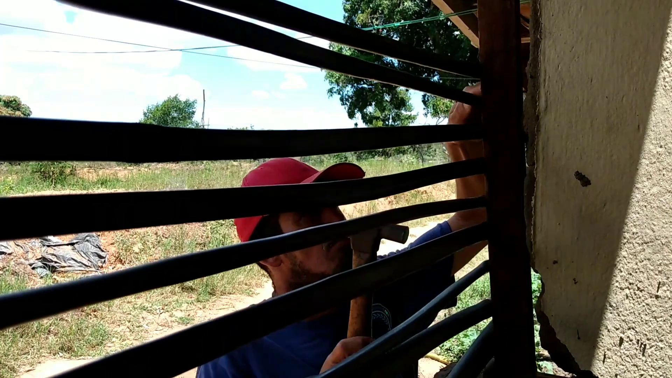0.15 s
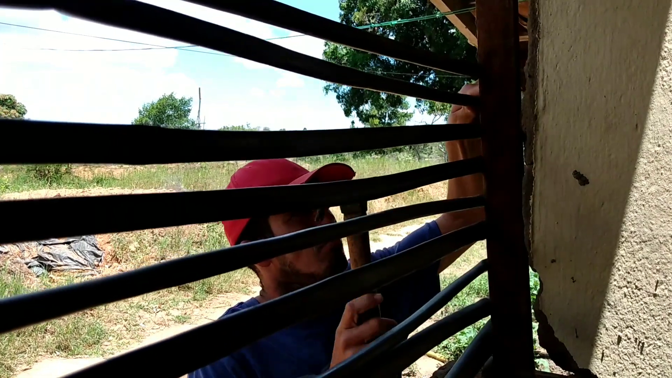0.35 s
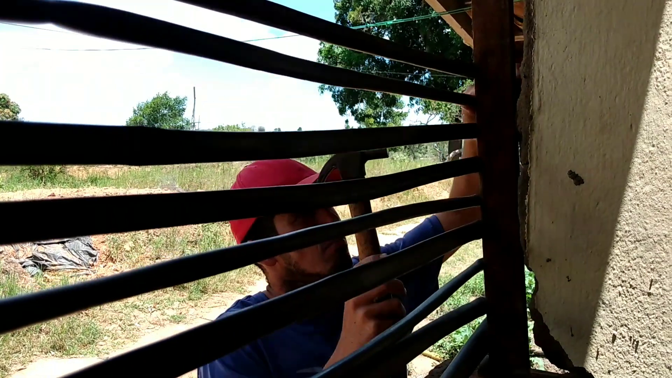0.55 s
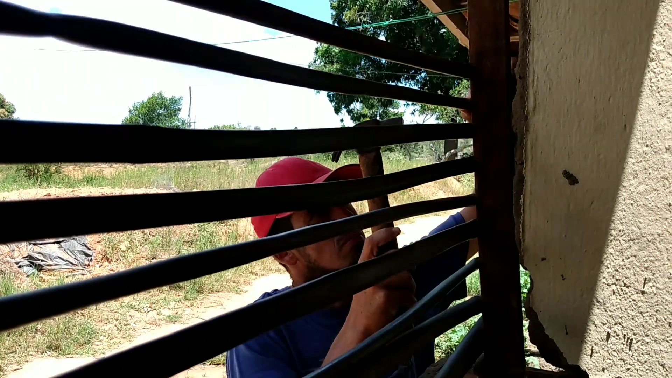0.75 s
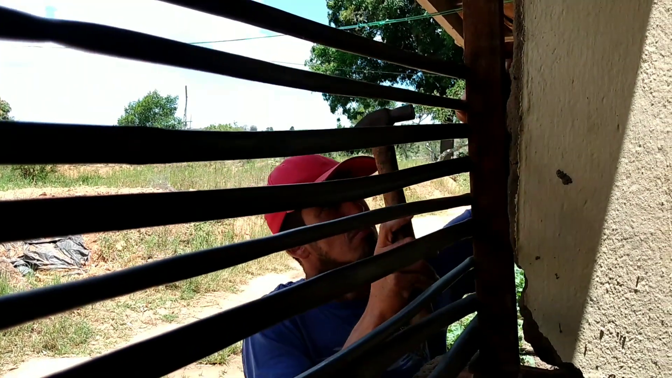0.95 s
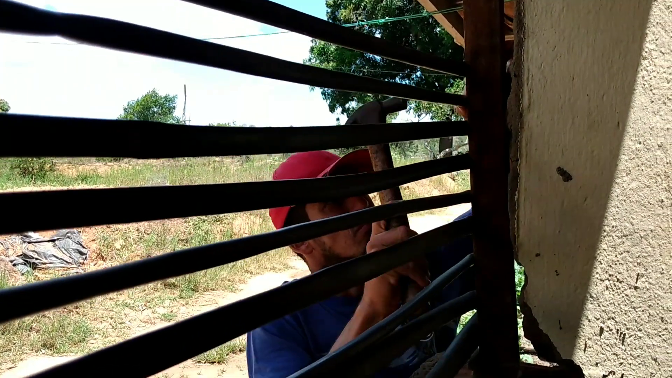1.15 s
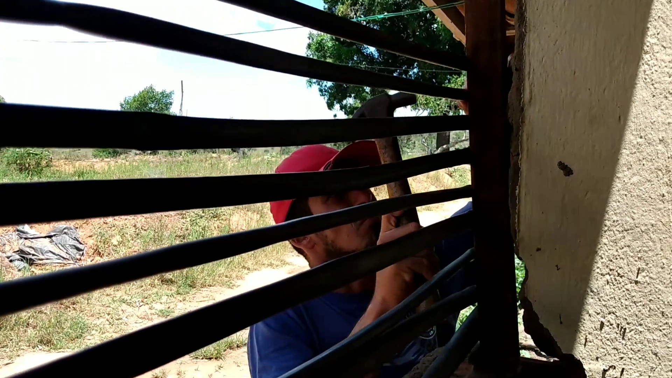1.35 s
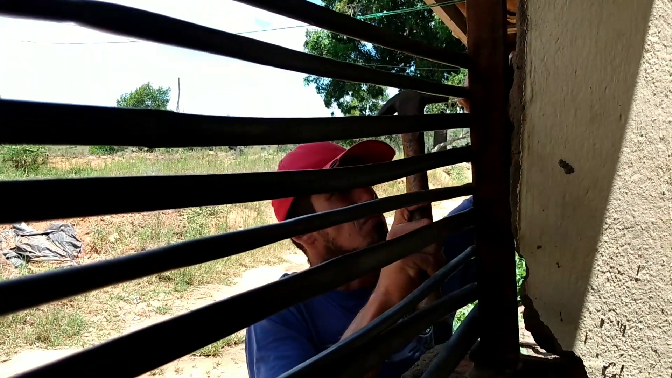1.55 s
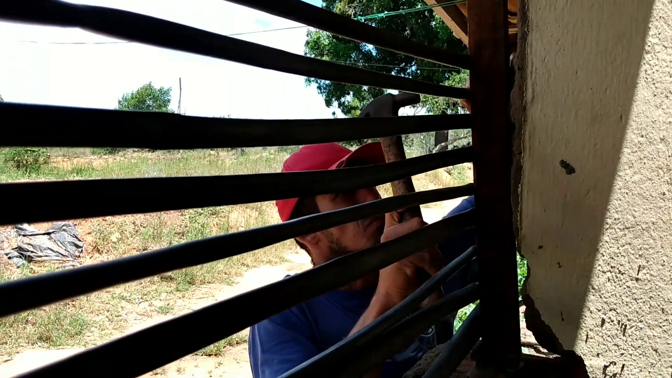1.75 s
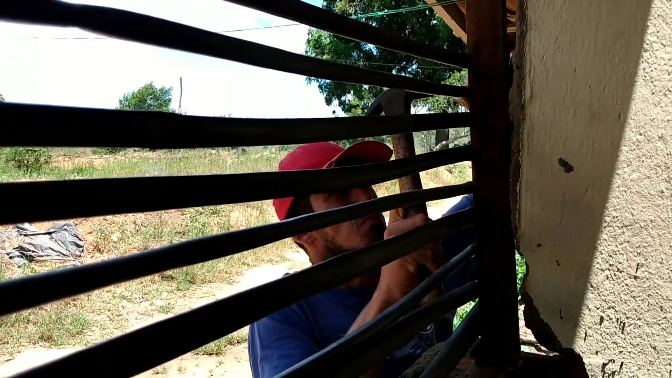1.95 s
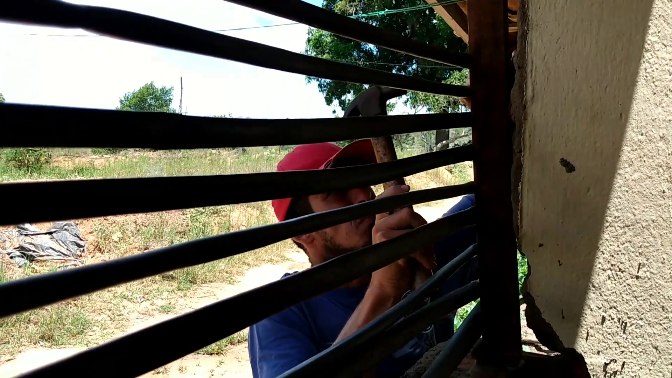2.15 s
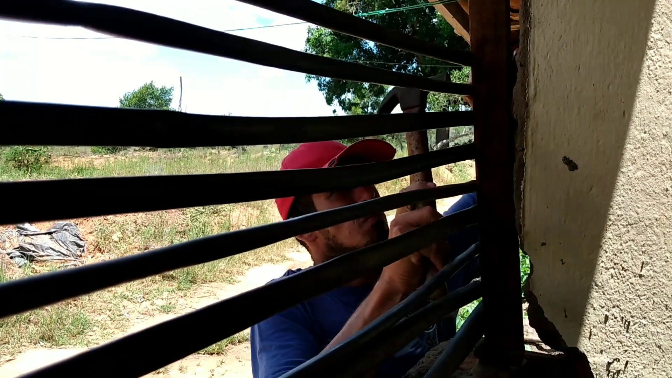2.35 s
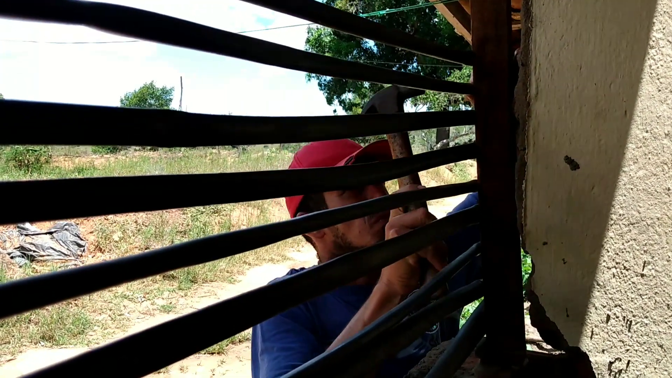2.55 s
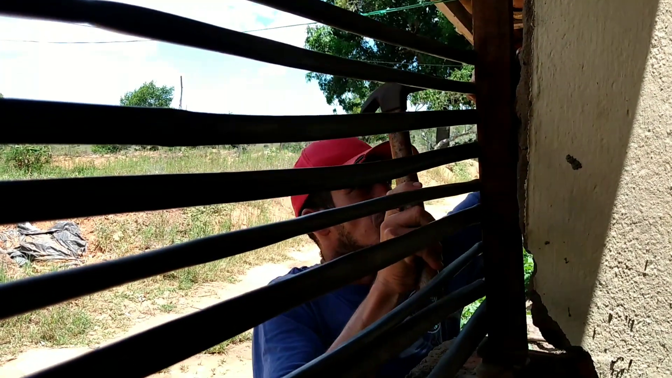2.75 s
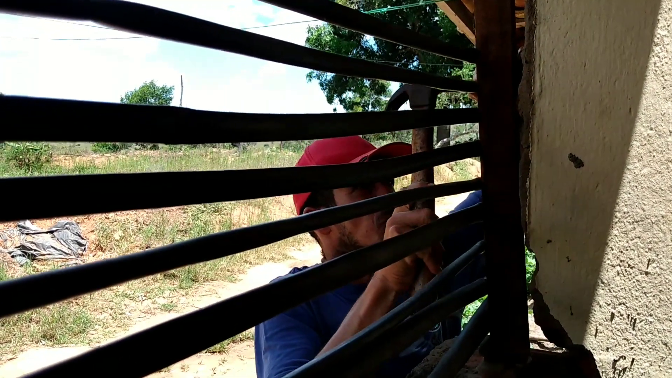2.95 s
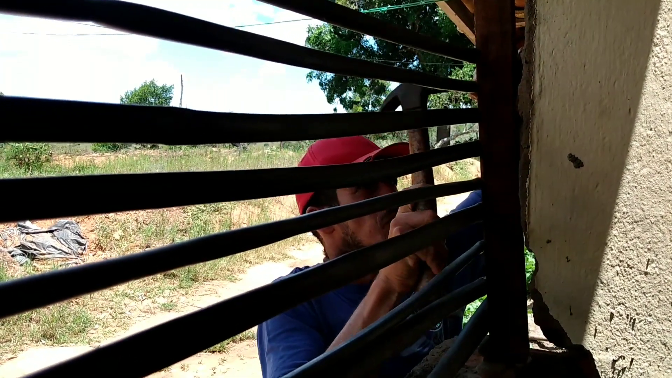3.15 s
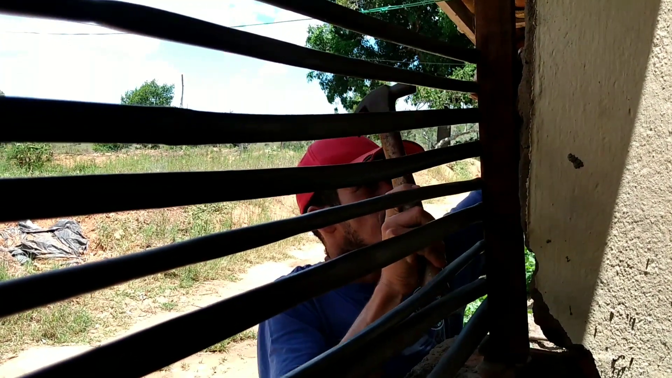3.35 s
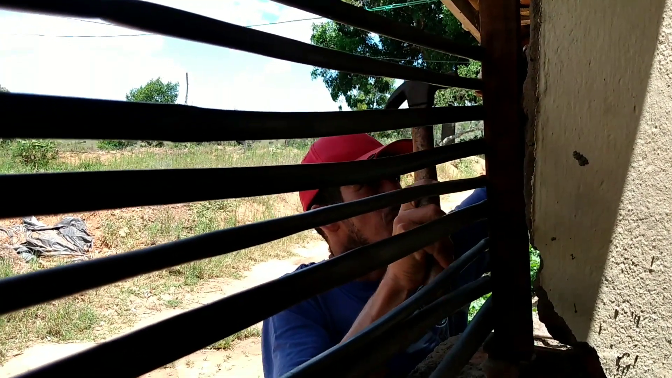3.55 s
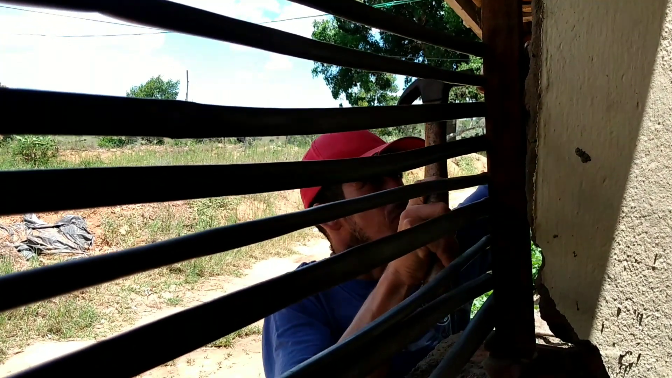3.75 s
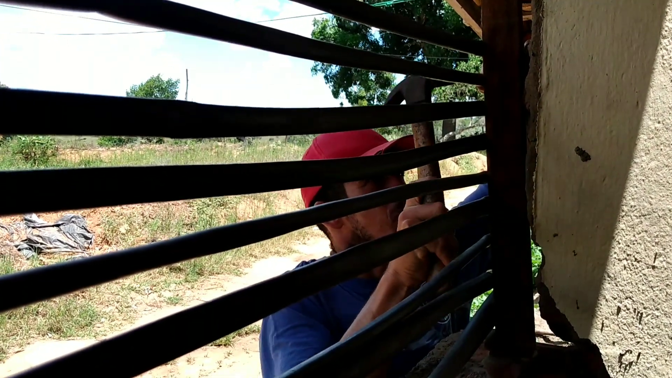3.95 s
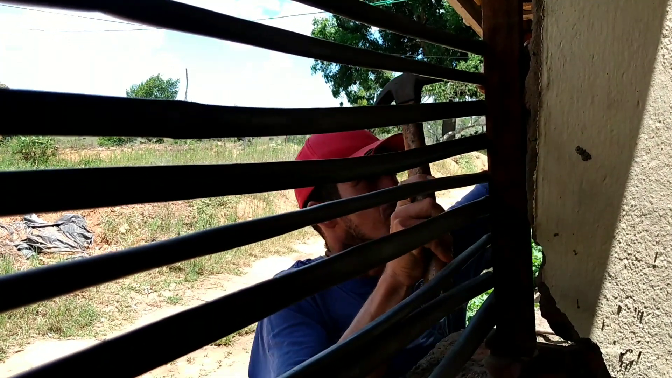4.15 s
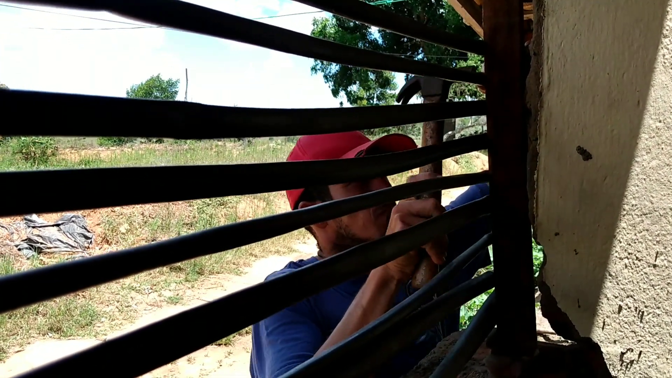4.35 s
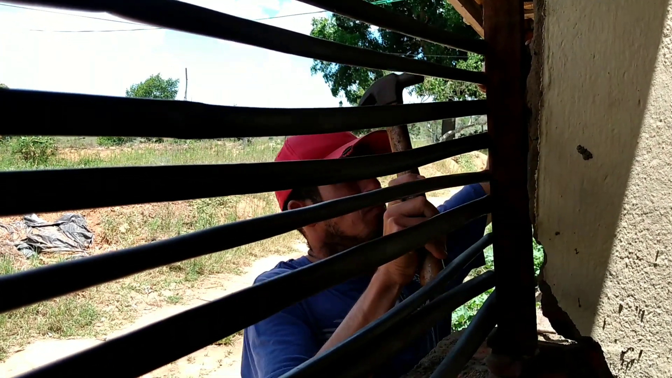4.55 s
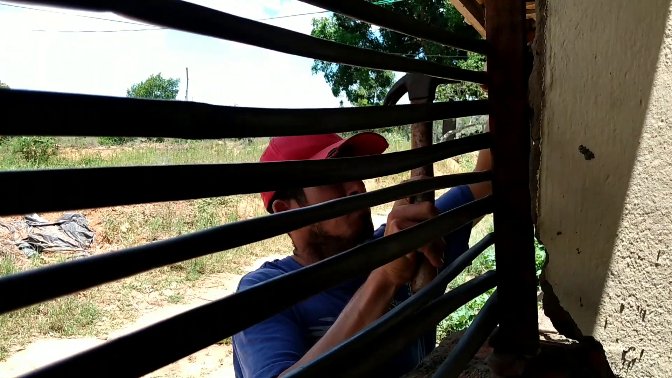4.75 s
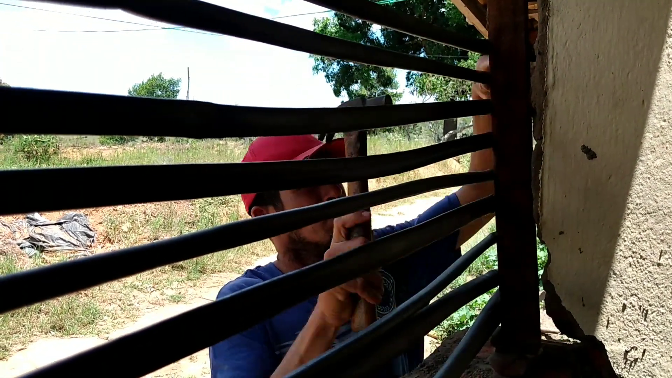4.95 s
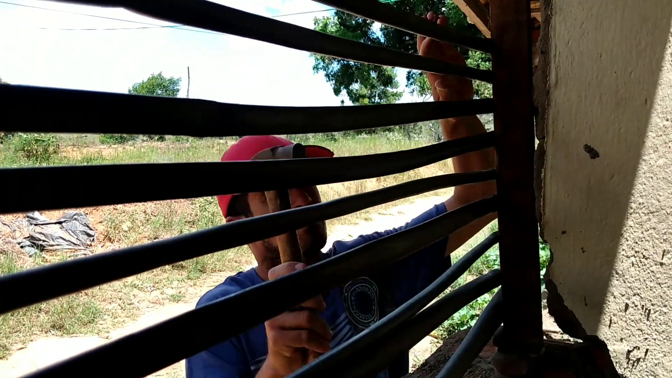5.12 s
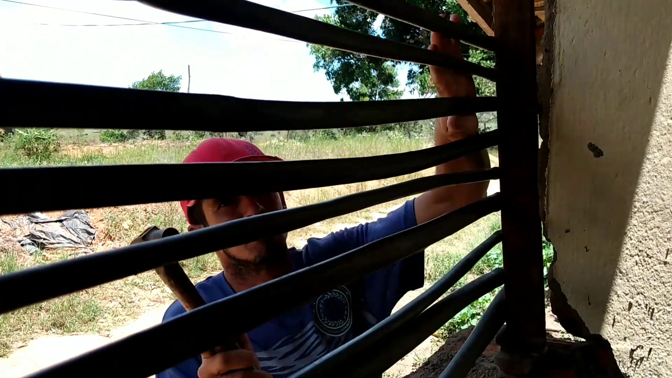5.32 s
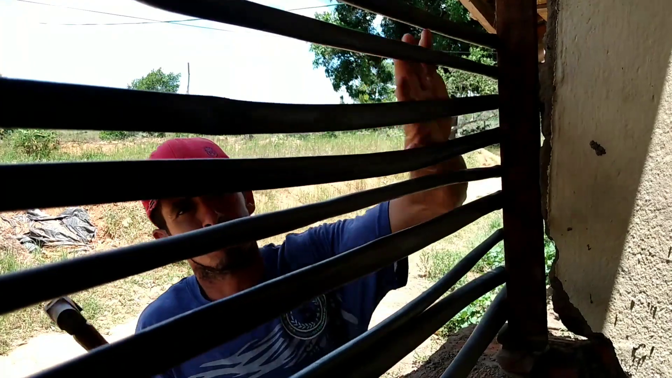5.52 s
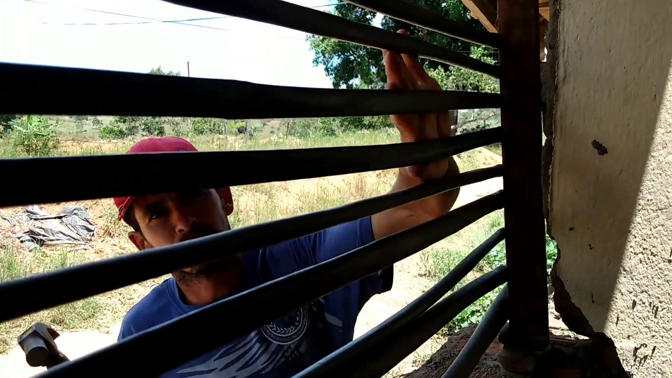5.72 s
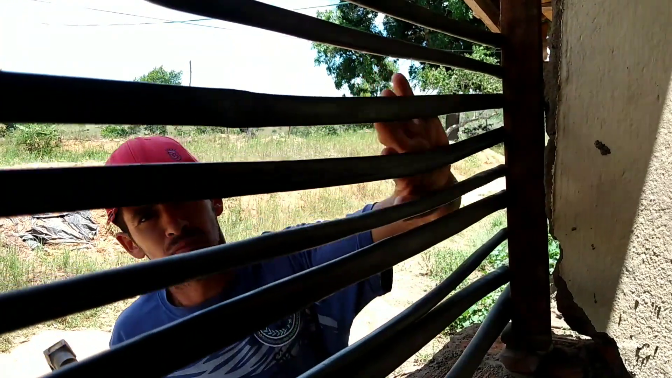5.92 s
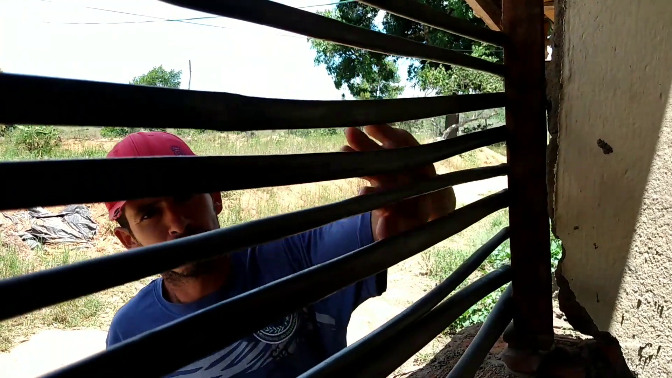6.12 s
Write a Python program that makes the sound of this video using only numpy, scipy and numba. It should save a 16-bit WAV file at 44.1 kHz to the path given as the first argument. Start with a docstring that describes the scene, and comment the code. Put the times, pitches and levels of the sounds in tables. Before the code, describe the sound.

A quiet outdoor yard beside a shed: thin, distant hiss of leaves and traffic, with a soft rustle of dry grass at the start and small puffs of low wind. A hammer taps a nail at about 0.45, 1.1, 1.65 and 2.0 seconds, barely more than tiny steel ticks. Taps at 2.4, 2.7 and 3.0 grow louder and woodier. From 3.3 to 4.4 come five hard, dry cracks, roughly 0.27 seconds apart, then a final one at 4.75, each with short, tight reflections and a brief diffuse tail. Wind rumble swells from 3.1 and batters the microphone with deep thumps between 3.75 and 4.65, heavier on the left. It then dies away. Around 5.15 to 5.6 dry ground crunches on the right, with brittle stalk snaps near 5.4; rustling fades and low gusts return on the left near 6. Background hiss lifts slightly with louder sounds.

```python
"""Broadband far hiss from leaves and traffic, strokes through dry ground, and wind eddies at two microphone ports.
A hammer then taps, and soon drives, a nail into a post outside a slatted shed, a little to the right: damped
modes of steel and wood are excited by short forces, with discrete reflections and diffuse decay.
Pressure pulses of wind grow hard among the later blows; after the last blow dry stalks snap, and ground and
gusts go on. Throughout, a level-dependent gain lifts the hiss whenever something louder sounds."""
import sys
import numpy as np
from scipy import signal
from scipy.fft import rfft, irfft
from scipy.io import wavfile
from scipy.ndimage import uniform_filter1d
from numba import njit

SR = 44100
rng = np.random.default_rng(int(sys.argv[2]) if len(sys.argv) > 2 else 0)


def gain_from_db(level_db):
    """Convert decibel levels to linear amplitude factors (20 dB per decade)."""
    decades = np.asarray(level_db, float) / 20
    return 10 ** decades


def to_wav(s):
    """Save 16-bit WAV."""
    ch = np.atleast_2d(s).T  # columns
    pcm = np.round(np.clip(ch, -1, 1) * 32767)  # PCM
    wavfile.write(sys.argv[1], SR, pcm.astype(np.int16))


N = 272538
TIME = np.arange(N) / SR
SIDES = np.array([[1], [-1]])  # left, right

# spectrum of far leaves and traffic: [frequency_hz, relative_level_db]
HISS_SPECTRUM = [(30, -42), (45, 4), (65, -1.5), (110, -13.5), (200, -14), (440, -12), (800, -12.5),
                 (1250, -16.5), (2160, -13.5), (4000, -16), (7500, -22), (10600, -21), (14500, -29),
                 (16500, -36)]
HISS_RMS_DB = -53.5
HISS_PAN_DB, HISS_LAG_S = -9, .0004  # left minus right in the treble; the bass reaches the right port later

# strokes through dry grass and grit:
# [start_s, hold_s, relative_level_db, fade_by_20_db_s, scrape_near_2500_hz_relative_db]
STROKES = [(0.0, .08, -56, .3, -10), (0.1, .18, -57, .08, -5), (1.15, .01, -57, .25, -14),
           (1.4, .04, -55, .17, -10), (1.88, .26, -68, .1, 2), (4.3, .06, -56, .05, -8),
           (5.15, .08, -58, .1, 2.5), (5.245, .02, -55, .08, -1), (5.31, .06, -53, .1, -5),
           (5.39, .015, -42.5, .12, 1.5), (5.46, .08, -51, .08, -6), (5.59, .25, -55, .45, -5)]
STROKE_RISE_S = .04  # time to rise by 20 dB
# spectrum of the rustle: [frequency_hz, relative_level_db]
RUSTLE_SPECTRUM = [(240, -44), (400, -11), (964, -11.5), (1140, -8), (2220, -12), (4180, -4.5), (11200, -3),
                   (16000, -16.5)]
# snapping dry stalks: [start_s, level_before_colouring_db]
SNAPS = [(5.234, -34), (5.391, -24), (5.399, -24)]

# puffs of wind on the ports: [start_s, hold_s, relative_level_at_windward_port_db, left_minus_right_db]
PUFFS = [(0.03, .05, -48, 8), (0.1, .18, -55, -4), (0.49, .045, -42, 15), (0.597, .07, -41, 19),
         (0.75, .04, -58, 0), (0.86, .03, -46, 14), (0.945, .03, -37, 24), (1.12, .05, -57, 3),
         (1.39, .08, -52, 12), (1.6, .04, -54, 10), (1.69, .07, -48, 14), (1.835, .08, -40, 22),
         (1.96, .145, -38, 20), (2.25, .12, -59, 9), (2.44, .05, -50, -2), (2.52, .04, -43, 12),
         (2.73, .08, -47, -3), (2.83, .05, -53, 2), (3.09, .06, -37, 18), (3.17, .08, -32, 24),
         (3.27, .14, -30, 7), (3.44, .1, -37, 10), (3.56, .125, -32, 2), (3.75, .04, -21, 30),
         (3.845, .08, -21, 9), (3.975, .04, -21, 14), (4.04, .03, -24, 12), (4.11, .11, -19, 12),
         (4.25, .04, -21, 2), (4.335, .03, -29, 3), (4.43, .025, -21, 12), (4.51, .035, -23, 19),
         (4.595, .04, -24, 14), (4.7, .09, -36, 6), (5.17, .04, -55, 0), (5.255, .03, -49, 9),
         (5.35, .16, -54, 1), (5.58, .12, -56, -3), (5.76, .07, -55, -2), (5.865, .02, -42, 14),
         (5.95, .06, -40, 22), (6.04, .04, -31, 30), (6.12, .06, -36, 25)]
PUFF_RISE_S, PUFF_FALL_S, CALM_DB = .03, .055, -68  # time to rise or fall by 20 dB; level between puffs
# single hard buffets: [nominal_time_s, level_before_filters_db, left_minus_right_db, rise_time_constant_ms]
BUFFETS = [(0.491, -33, 10, 1), (0.6, -30, 18, 1), (0.95, -30, 20, 1), (1.837, -28, 23, 1),
           (1.898, -21.5, 23, 1), (1.96, -26.5, 14, .9), (2.55, -30, 5, 1), (3.223, -17, 27, 1),
           (3.769, -12, 27, .7), (3.857, -6.5, 7.5, .35), (3.874, -12, 16, .8), (3.889, -5, 20, .3),
           (3.91, -6, 16, 1.2), (3.932, -9, 16, .6), (3.979, -5, 15, .5), (3.997, -2, 26, .36),
           (4.065, -18, 9, .6), (4.123, 1.5, 25, .6), (4.135, -1, 25, .4), (4.165, -6, 15, 1),
           (4.187, 2, 23, .32), (4.259, -3.5, 9, .85), (4.284, -1.5, -14, 1), (4.449, -11, 1, .55),
           (4.511, -17, 22, .75), (4.593, -13, 8, .7), (4.628, -12, 25, 1)]

# hammer blows: [nominal_time_s, relative_steel_level_db, relative_wood_level_db, push_time_to_peak_ms]
BLOWS = [(0.4529, -43, -78, 0.04), (1.1318, -39, -71, 0.04), (1.6546, -37, -58, 0.052),
         (2.0009, -34, -52, 0.04), (2.4328, -32, -44.5, 0.09), (2.7181, -27.5, -36, 0.13),
         (3.0083, -22.5, -28, 0.051), (3.2839, -13, -20.5, 0.034), (3.5525, -11.5, -18.5, 0.042),
         (3.819, -11.5, -18, 0.036), (4.092, -13.5, -18, 0.034), (4.3795, -13, -18, 0.031),
         (4.7403, -11.5, -18.5, 0.031)]
# modes of the nail and hammer head, damped by wood and hand: [mean_pitch_hz, mean_relative_level_db, t60_s]
STEEL_MODES = [(6480, -5, 0.00098), (7700, -6, 0.0034), (9040, -8, 0.0066), (9900, -0.5, 0.0031),
               (12300, 9, 0.001), (14530, 9, 0.001), (14440, -1, 0.0033)]
# modes of the post, heavily damped: [mean_pitch_hz, mean_relative_level_db, t60_s]
POST_MODES = [(306, -3.5, 0.049), (376, -8.5, 0.038), (463, -5, 0.045), (696, -1, 0.052),
              (1050, 0.5, 0.017), (1460, -2.5, 0.022), (2143, 1.5, 0.0089), (3088, 1, 0.016),
              (3736, -2.5, 0.013), (5000, -2.5, 0.004)]
# single reflections: [delay_s, left_level_db, right_level_db, low_corner_hz, high_corner_hz]
ECHOES = [(.0035, -4, -7, 400, 5000), (.008, 5, 4, 510, 4500), (0.015, -16, 1, 8000, 16000),
          (.0195, -8, 3, 8000, 15000), (.027, 2.5, -2.5, 290, 3500), (.038, -4, 5, 300, 2000),
          (0.0487, -16, 1, 8000, 15000)]
# diffuse sound of shed and yard:
# [band_centre_hz, relative_level_db, t60_s, left_minus_right_db, likeness_of_ports_0_to_1]
YARD = [(216, -12, 0.37, -1, 1), (400, -19, .35, -16, 1), (740, -20, 0.36, -3.5, .6),
        (1650, -18.5, 0.31, -10, 0), (3330, -19.5, 0.31, -9, 0.1), (6900, -21, .28, -15, 0.02),
        (12500, -30, 0.19, -11.5, 0.4), (17700, -37.5, 0.14, 0, 0.2)]


def shaped(x, gain):
    """Linear filtering: the spectrum is multiplied by a gain given as a function of Hz."""
    hz = np.fft.rfftfreq(x.shape[-1], 1 / SR) + 1  # 1 Hz up, to avoid zero
    return irfft(rfft(x) * gain(hz), x.shape[-1])


def colour(points):
    """Spectral envelope: (Hz, dB) points are interpolated along log frequency."""
    hz, db = np.transpose(points)
    return lambda f: gain_from_db(np.interp(np.log(f), np.log(hz), db))


def unit(x):
    """Normalisation of a signal to rms 1."""
    return x / np.sqrt(np.mean(x ** 2))


def walk(rate):
    """Slow random modulation: levels held for 1 / rate s, smoothed twice, with spread near 1."""
    hold = int(SR / rate)
    steps = np.repeat(rng.standard_normal(N // hold + 1), hold)
    smooth = uniform_filter1d(uniform_filter1d(steps, hold), hold)
    return 1.54 * smooth[:N]


def pair(size, alike):
    """Partial coherence: common and opposed noise are mixed so two ports correlate by the given share."""
    mid, side = rng.standard_normal((2, size))
    alike = np.clip(alike, 0, 1)
    return np.sqrt((1 + alike) / 2) * mid + np.sqrt((1 - alike) / 2) * side * SIDES


def add(out, s, sound):
    """Superposition of a sound into the mix, starting at s seconds."""
    k = int(s * SR)
    out[..., k:k + sound.shape[-1]] += sound[..., :N - k]


def swell(s, hold_s, rise_s, fall_s):
    """Exponential attack, hold and release as a dB envelope; each slope is the time for 20 dB."""
    before = np.maximum(s - TIME, 0)
    after = np.maximum(TIME - s - hold_s, 0)
    return -20 * (before / rise_s + after / fall_s)


def leaves():
    """A distant diffuse field: smooth noise, coherent between the ports only in the bass."""
    bass = shaped(pair(N, 0.81),
                  lambda f: np.exp(1j * np.pi * f * HISS_LAG_S * SIDES) / np.sqrt(1 + (f / 900) ** 4))
    treble = shaped(pair(N, 0), lambda f: 1 / np.sqrt(1 + (900 / f) ** 4))
    treble = gain_from_db(SIDES * HISS_PAN_DB / 2) * treble
    return gain_from_db(HISS_RMS_DB) * unit(shaped(bass + treble, colour(HISS_SPECTRUM)))


def ground():
    """Granular friction: sparse random impulses over smooth noise, a mid-band scrape, and snapping stalks."""
    grain_level = gain_from_db(np.minimum(4.7 * rng.exponential(1, (2, N)), 12))
    present = rng.random((2, N)) < .06
    grains = grain_level * present * rng.standard_normal((2, N))
    grit = unit(grains) + 2.1 * rng.standard_normal((2, N))
    rustle = unit(shaped(grit, colour(RUSTLE_SPECTRUM)))
    scrape = unit(shaped(grit, lambda f: 1 / (1 + ((f - 2500) / 700) ** 2)))
    strokes, snaps = 0, np.zeros((2, N))
    for s, hold_s, db, fade_s, scrape_db in STROKES:
        level = gain_from_db(db + swell(s, hold_s, STROKE_RISE_S, fade_s))
        strokes = strokes + level * (rustle + gain_from_db(scrape_db) * scrape)
    for s, db in SNAPS:
        add(snaps, s, gain_from_db(db) * np.exp(-TIME[:200] / .0004) * rng.standard_normal((2, 200)))
    # strokes lie to the right and waver a little in level
    placed = gain_from_db(-SIDES * 6.77 + 0.94 * walk(30)) * strokes
    return placed + shaped(snaps, colour(RUSTLE_SPECTRUM))


def eddies(gain, even_s):
    """Turbulent pressure: incoherent noise at each port, its slow fluctuation of power evened out."""
    x = shaped(rng.standard_normal((2, N)), gain)
    return x / np.sqrt(uniform_filter1d(x ** 2, int(even_s * SR)) + 1e-18)


def wind():
    """Turbulence at the ports: the high band grows faster than the low as gusts harden; pulses buffet."""
    power = gain_from_db(CALM_DB) ** 2
    for s, hold_s, db, pan in PUFFS:
        shelter = gain_from_db(np.minimum(SIDES * pan, 0))  # only the leeward port is weakened
        power = power + shelter ** 2 * gain_from_db(db + swell(s, hold_s, PUFF_RISE_S, PUFF_FALL_S)) ** 2
    port_db = 10 * np.log10(power)
    lumps = np.array([walk(60), walk(60)])
    low = eddies(lambda f: f / 60 / (1 + (f / 76) ** 3.31), even_s=0.034)
    high = eddies(lambda f: (f / 150) ** 2.8 / (1 + (f / 220) ** 5.5), even_s=0.019)
    high_db = -8.5 + 0.3 * (port_db + 16) + 2.8 * lumps
    out = gain_from_db(port_db) * (low + gain_from_db(high_db) * high)
    for s, db, pan, rise_ms in BUFFETS:
        u = (TIME[:SR // 20] - .008) * 1000 / rise_ms
        # pressure builds to a pointed crest and sags more slowly
        pulse = np.exp(-np.hypot(u, .4) * np.where(u < 0, 1, .6))
        add(out, s - .0062, gain_from_db(db + np.minimum(SIDES * pan, 0)) * pulse)
    # the treble and the lowest bass are rolled off, buffets included
    out = shaped(out, lambda f: 1 / (1 + (f / 1500) ** 4) / (1 + (36 / f) ** 4))
    # the port's own resonant low cut
    return signal.sosfilt(signal.cheby1(2, 3.5, 58, "high", fs=SR, output="sos"), out)


def ring(modes, scatter_db):
    """Modal impulse response: damped sines, neighbours in opposite phase, with random pitch and level."""
    hz, db, t60 = np.transpose(modes)[:, :, None]
    chance = rng.standard_normal((2, len(modes), 1))
    t = TIME[:SR // 20]
    sign = (-1) ** np.arange(len(modes))[:, None]
    hz = hz * (1 + .012 * chance[1])
    level = gain_from_db(db + scatter_db * chance[0] - 60 * t / t60)
    return (sign * level * np.sin(2 * np.pi * hz * t)).sum(0)


def flat_burst(size):
    """Broadband excitation: a short burst with a flat magnitude spectrum and random phase."""
    return irfft(np.exp(2j * np.pi * rng.random(size // 2 + 1)))


def strike(body, force, db):
    """Forced vibration: force convolved with the body's response; db sets the energy at each port."""
    y = signal.fftconvolve(body[None], np.atleast_2d(force), axes=1)
    return gain_from_db(db) * y / np.sqrt(np.sum(y ** 2, -1, keepdims=True))


def paths():
    """Specular propagation: a direct impulse and delayed, band-limited reflections."""
    out = np.zeros((2, SR // 2))
    for delay, left_db, right_db, low_hz, top_hz in ECHOES:
        click = np.zeros_like(out)
        click[:, int(delay * SR)] = gain_from_db(np.array([left_db, right_db]))
        out += shaped(click, lambda f: 1 / (1 + (f / top_hz) ** 4) / (1 + (low_hz / f) ** 4))
    out[:, 0] += gain_from_db(np.array([7., 9.]))
    return out


def scatter():
    """Diffuse reverberation: overlapping noise bands decay exponentially, the treble soonest."""
    t, out = TIME[:SR // 2], 0
    for hz, db, t60, pan_db, alike in YARD:
        band = shaped(pair(len(t), alike), lambda f: np.cos(np.pi / 2 * np.clip(np.log2(f / hz), -1, 1)))
        decay = gain_from_db(db + SIDES * pan_db / 2 - 60 * t / t60)
        out = out + band * decay * (1 - np.exp(-t / 0.0004))
    return out


def hammer():
    """Impact excitation: steel sounds first and the post just after, each with reflections and diffuse decay."""
    out, direct, shed = np.zeros((2, N)), paths(), gain_from_db(-0.5) * scatter()
    t = TIME[:SR // 20]
    for s, steel_db, wood_db, push_ms in BLOWS:
        steel, wood = ring(STEEL_MODES, scatter_db=2.2), ring(POST_MODES, scatter_db=0.6)
        # the tick is a short burst at the left port and a longer, swelling one at the right
        tick = np.zeros((2, 192))
        tick[0, 80:128] = flat_burst(size=48)
        tick[1] = flat_burst(size=192) * np.hanning(192)
        # a longer push on the wood sounds duller
        push = t[:SR // 200] * 1000 / push_ms
        push = push * np.exp(-push)
        near, far = np.zeros((2, 2, SR // 10))
        add(near, 0, strike(steel, tick, steel_db + 7.5))
        add(near, .0028, strike(wood, push, wood_db + 16))
        # averaged over all directions the modes blur into broad humps
        add(far, .0015, strike(steel * np.exp(-t / .00016), [1.], steel_db + 7.5))
        add(far, .0028, strike(wood * np.exp(-t / .0014), push, wood_db + 13))
        diffuse = shed + gain_from_db(-1.0) * scatter()  # one part shared by all blows, one drawn for each
        add(out, s - .0015, signal.fftconvolve(near, direct, axes=1))
        add(out, s - .0015, signal.fftconvolve(far, diffuse, axes=1))
    return out


def scene():
    """Linear superposition of all sources at the two ports."""
    return leaves() + ground() + wind() + hammer()


@njit
def follow(x, attack, release):
    """Envelope detection: a first-order average that rises fast and falls slowly."""
    e, out = 0., np.empty(len(x))
    for i in range(len(x)):
        e += (x[i] - e) * (attack if x[i] > e else release)
        out[i] = e
    return out


def roll_off(x):
    """The treble ends steeply here."""
    return signal.sosfilt(signal.butter(12, 16960, fs=SR, output="sos"), x)


def record(dry):
    """Downward expansion: a soft gate shared by both channels lowers quiet moments; the top is cut."""
    level = follow(np.abs(dry).mean(0), 1 / (0.002 * SR), 1 / (0.043 * SR))  # 2 ms attack, 43 ms release
    open_db, slope, depth_db = -40, .6, 10
    gain_db = np.clip(slope * (20 * np.log10(level + 1e-9) - open_db), -depth_db, 0)
    top_hz = 15900
    mix = shaped(dry * gain_from_db(gain_db), lambda f: 1 / (1 + (f / top_hz) ** 60))
    return roll_off(mix)


dry = scene()
out = record(dry)
to_wav(out)
```